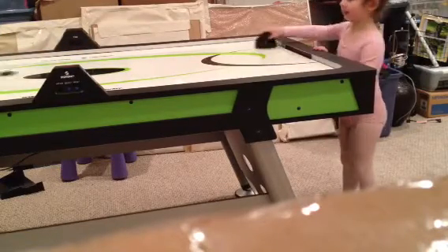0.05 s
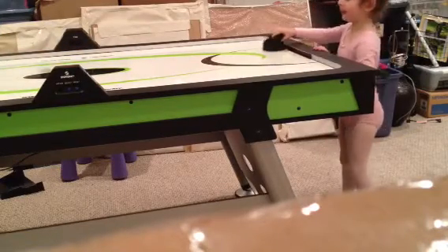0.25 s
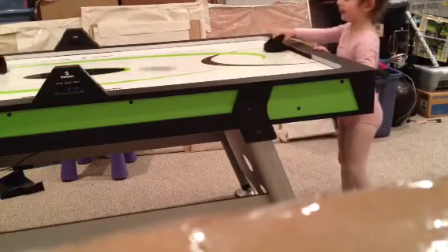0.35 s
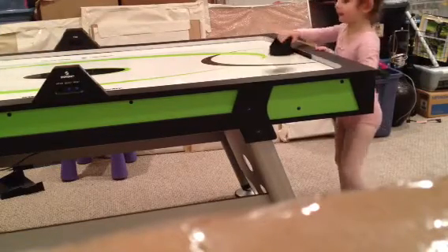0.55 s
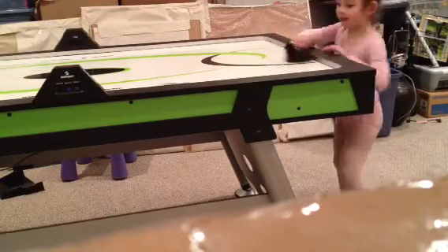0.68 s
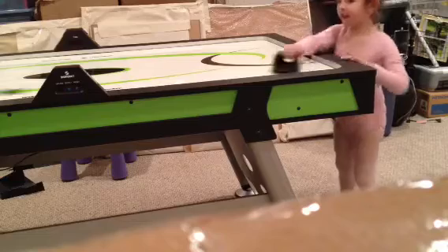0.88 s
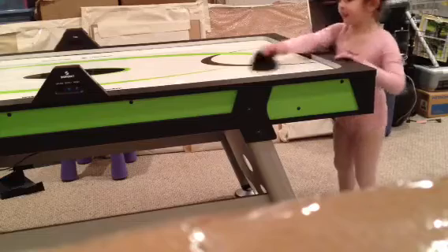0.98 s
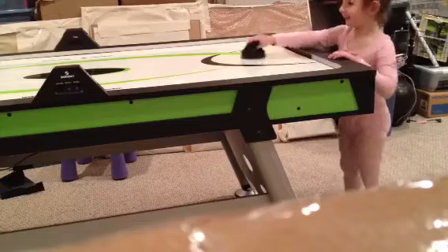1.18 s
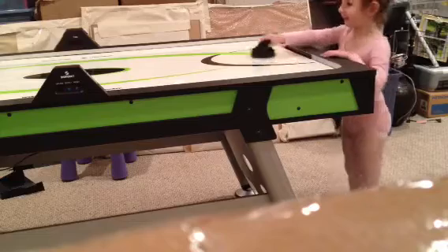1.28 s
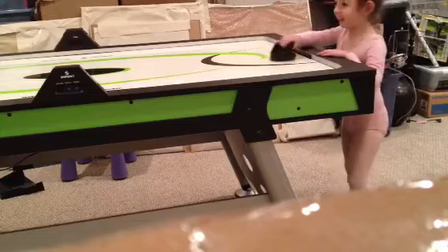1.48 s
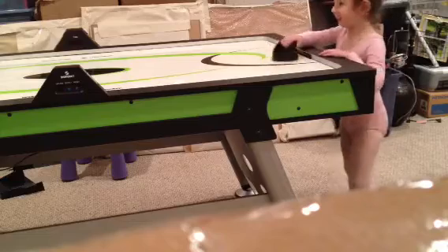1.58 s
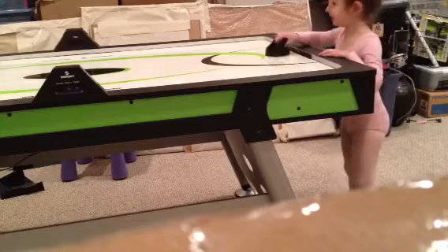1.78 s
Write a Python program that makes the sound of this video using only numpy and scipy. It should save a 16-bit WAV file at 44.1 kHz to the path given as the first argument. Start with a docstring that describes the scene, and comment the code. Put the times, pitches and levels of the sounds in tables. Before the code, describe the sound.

Air hockey puck clacking sharply off mallet and table rails over a low blower hum

```python
"""Air hockey in a carpeted room, one mono microphone; the blower's rushing air and hum run throughout.
At 0.12 s the mallet bumps and judders over the playfield with a sinking tone; at 0.21 s it strikes the puck.
The puck clacks off the rails in close pairs near 0.55 and 0.70 s; struck again at 1.12 s, it hits rails at 1.20 and 1.50 s.
Contacts are filtered clicks plus damped sines, spread by echoes, panel noise and a decaying noise room.
Strikes also make the hollow table drone: a slow-rising burst of low noise."""
import sys
import numpy as np
from scipy import signal
from scipy.fft import rfft, irfft, next_fast_len
from scipy.io import wavfile
from scipy.ndimage import map_coordinates

SR = 44100
rng = np.random.default_rng(int(sys.argv[2]) if len(sys.argv) > 2 else 0)


def transcribe(u):
    """Save the signal u as a 16-bit wav file named by the first command-line argument.

    u: samples, shape (n,) or (channels, n), limited to [-1, 1]; the rate is SR.
    q: integer samples, one column per channel.
    """
    v = np.clip(np.atleast_2d(u).T, -1, 1)
    q = np.round(v * 32767).astype(np.int16)
    wavfile.write(sys.argv[1], SR, q)


N = 81585  # 1.85 s
T = np.arange(int(SR * .6)) / SR  # time axis of one contact, s


def amp(db):
    """Decibels to gain."""
    return 10 ** (np.asarray(db) / 20)


def unit(x):
    """Scale to energy 1."""
    return x / np.sqrt(np.sum(x ** 2) + 1e-20)


def along(points, hz):
    """Read (pitch_hz, value) points on a log-frequency axis."""
    f, v = np.transpose(points)
    return np.interp(np.log(hz + 1), np.log(f + 1), v)


def wobble(rate):
    """A smooth random curve, rate knots a second."""
    knots = rng.standard_normal(int(N * rate / SR) + 4)
    return map_coordinates(knots, [np.arange(N) * rate / SR])


def filtered(x, response):
    """x times a response of frequency."""
    m = next_fast_len(len(x) + SR // 2)
    return irfft(rfft(x, m) * response(np.fft.rfftfreq(m, 1 / SR)), m)[:len(x)]


def through(x, response):
    """x convolved with a response."""
    return signal.fftconvolve(x, response)[:len(T)]


def add(out, s, x):
    """Mix x into out at time s."""
    part = out[round(s * SR):][:len(x)]
    part += x[:len(part)]


def fade(t, t60):
    """Exponential decay by 60 dB in t60 seconds."""
    return np.exp(-np.log(1000) * t / t60)


def burst(t60, rise_s):
    """Decaying noise of energy 1."""
    return unit(rng.standard_normal(len(T)) * fade(T, t60) * (1 - np.exp(-T / rise_s)))


def ring(hz, t60):
    """One damped mode of energy 1."""
    return unit(np.sin(2 * np.pi * hz * T) * fade(T, t60))


# Mallet on puck. Columns: start_s, level_db, bass_db, treble_db, panel_shake_db, room_db, snap_db,
# spot_pitch_hz (resonance of the struck spot), spot_db, puck_mode_1_db, puck_mode_2_db, puck_mode_3_db
MALLET_STRIKES = [(0.2085, 9, 6.5, 8, -1, -3.5, -9, 1750, -4, -13.5, -14, -17),
                  (1.1225, 6, 8, 7.5, 0.5, -2.5, -3, 2180, -1.5, -11.5, -13, -22)]
# Colour of the mallet's contact. Columns: pitch_hz, relative_level_db
MALLET_COLOUR = [(50, -48), (110, -44), (230, -7.5), (450, -3), (720, -9), (1100, -0.5), (1380, -10),
                 (1600, 1.5), (3000, 6), (3800, -4), (7000, -11.5), (13000, -17), (15500, -24)]
# Ringing modes of the mallet contact. Columns: pitch_hz, level_db, t60_s
MALLET_RING = [(1600, -8, 0.14), (2300, -17, 0.099), (2690, -38, 0.13), (3010, -24, 0.046)]


def mallet_strikes():
    """The plastic mallet meets the puck: a click and damped modes, with a quick rise of the panels."""
    return puck_hits(MALLET_STRIKES, MALLET_COLOUR, MALLET_RING,
                     direct_db=-8, shake_t60=0.074, shake_rise_s=0.00064)


# Puck on a rail. Columns: as in MALLET_STRIKES
RAIL_REBOUNDS = [(0.5395, 8, 1, 7, 1, 0.41, -14, 860, -6, -20, -17, -12),
                 (0.5645, -2, -1, 10, 1, -5, -6, 620, -2, -8, -13, -22),
                 (0.6995, -3, -5, -5, 0.8, -2, -26, 2040, -3.5, -33, -10.5, -34),
                 (0.7090, 0, 1.5, -21, 0.97, -4, -28, 1250, -5.5, -32, -19, -32),
                 (1.2030, 12, -3.5, 4, 0, -3.76, -27, 1074, -11.5, -27, -20.5, -39),
                 (1.4972, 9, -1, 3.5, 1, -2.55, -18, 576, -13.5, -16.5, -18.5, -15.5)]
# Colour of the rail contact. Columns: pitch_hz, relative_level_db
RAIL_COLOUR = [(50, -40), (170, -36), (300, -13.5), (520, 4), (1000, 1.5), (1350, 3), (2400, 1),
               (4600, -5.5), (5700, -17.5), (8000, -22), (9500, -21), (12800, -19.5), (15500, -36)]
# Ringing modes of the rail. Columns: pitch_hz, level_db, t60_s
RAIL_RING = [(568, -34.5, 0.27), (740, -24, 0.31), (890, -25, 0.16), (1066, -18, 0.18), (1620, -17.5, 0.18),
             (3150, -23, 0.037)]


def rail_rebounds():
    """The puck clacks off the rails, ringing lower modes and shaking the panels more slowly."""
    return puck_hits(RAIL_REBOUNDS, RAIL_COLOUR, RAIL_RING,
                     direct_db=-12, shake_t60=0.081, shake_rise_s=0.0015)


# The puck's own thin ring. Columns: pitch_hz, t60_s
PUCK_RING = [(8150, .05), (10370, .1), (12070, .025)]
PUCK_ROOM_DB = -9


def puck_hits(hits, colour, modes, direct_db, shake_t60, shake_rise_s):
    """The puck meets something hard: a snap, a crack with that object's modes, and its own thin, drier ring."""
    out = np.zeros(N)
    for s, db, bass_db, treble_db, shake_db, room_db, snap_db, spot_hz, spot_db, *puck_db in hits:
        heard_by = direct_db, shake_db, shake_t60, shake_rise_s, room_db
        contact = crack(colour, bass_db, treble_db) + body(modes)
        clack = spread(contact, *heard_by)
        spot = spread(spot_ring(spot_hz), *heard_by)
        puck = sum(amp(level) * ring(hz, t60) for level, (hz, t60) in zip(puck_db, PUCK_RING))
        puck = puck + amp(PUCK_ROOM_DB) * through(puck, room_tail())
        add(out, s, amp(db) * (clack + amp(spot_db) * spot + amp(snap_db) * snap() + puck))
    return out


BASS_HZ, TREBLE_HZ = 510, 4600  # turnover of the shelves that tilt each hit


def crack(colour, bass_db=0, treble_db=0, size=4096):
    """The causal click of one contact: a minimum-phase spectrum, tilted by two shelves."""
    hz = np.fft.rfftfreq(size, 1 / SR)
    gain = amp(along(colour, hz))
    level_gain = gain / np.sqrt(np.mean(gain ** 2))
    bass = bass_db / (1 + (hz / BASS_HZ) ** 2)
    treble = treble_db * hz ** 2 / (hz ** 2 + TREBLE_HZ ** 2)
    # folding the cepstrum forward in time puts the energy at the start of the click
    cep = irfft(np.log(level_gain * amp(bass + treble)))
    cep[1:size // 2] *= 2
    cep[size // 2 + 1:] = 0
    return np.pad(irfft(np.exp(rfft(cep))), (0, len(T) - size))


def body(modes):
    """The ring of a struck object: a sum of damped modes."""
    return sum(amp(db) * ring(hz, t60) for hz, db, t60 in modes)


SPOT_WIDTH = 0.23  # half-width of the resonance, as a share of its pitch


def spot_ring(hz):
    """The short, broad resonance of the place that is hit: a band-passed impulse."""
    edges = [hz * (1 - SPOT_WIDTH), hz * (1 + SPOT_WIDTH)]
    band = signal.butter(2, edges, "bandpass", fs=SR, output="sos")
    return unit(signal.sosfilt(band, signal.unit_impulse(len(T))))


# Colour of the hard edge contact. Columns: pitch_hz, relative_level_db
SNAP_COLOUR = [(200, -38), (3000, -33), (7000, 2.5), (10000, -6.5), (12500, 7.5), (15500, -21)]
SNAP_T60, SNAP_ECHO_S, SNAP_ECHO_DB = 0.0039, 0.0038, 13  # the echo glances off the playfield


def snap():
    """The bright, dry tick of plastic edges and its first reflection, louder than the tick itself."""
    tick = burst(SNAP_T60, .0001)
    add(tick, SNAP_ECHO_S, amp(SNAP_ECHO_DB) * burst(SNAP_T60, .0001))
    return unit(through(crack(SNAP_COLOUR), tick))


# Nearby surfaces. Columns: delay_s (nominal, after the direct sound), level_db (relative to direct)
NEARBY_ECHOES = [(.0036, 0), (.0138, 0.5), (.0205, -9), (0.0338, -5.5)]
SCATTER_T60, SCATTER_RISE_S = 0.0054, .0001  # each sound path is slightly smeared
RADIATE_HZ = 136  # the panels radiate little below this


def spread(contact, direct_db, shake_db, shake_t60, shake_rise_s, room_db):
    """A contact heard direct, off nearby surfaces, through the table's dense panel modes and in the room."""
    path = amp(direct_db) * burst(SCATTER_T60, SCATTER_RISE_S)
    for delay, db in NEARBY_ECHOES:
        varied_delay = abs(delay * (1 + .06 * rng.standard_normal()))
        add(path, varied_delay, amp(direct_db + db) * burst(SCATTER_T60, SCATTER_RISE_S))
    panels = unit(burst(shake_t60, shake_rise_s) * lumps())
    room = unit(room_tail() * lumps())
    heard = through(contact, path + amp(shake_db) * panels + amp(room_db) * room)
    low_cut = signal.butter(3, RADIATE_HZ, "highpass", fs=SR, output="sos")
    return signal.sosfilt(low_cut, heard)


RAGGED_DB, RAGGED_PER_S, RAGGED_FADE_S = 2, 300, .04  # depth, knots a second, time constant


def lumps():
    """Early reflections arrive in clumps that soon even out: a fast random gain."""
    return amp(RAGGED_DB * wobble(RAGGED_PER_S)[:len(T)] * np.exp(-T / RAGGED_FADE_S))


# Decay of the carpeted room. Columns: pitch_hz, t60_s
ROOM_DECAY = [(100, 0.15), (400, 0.37), (1000, 0.32), (3000, 0.34), (7000, 0.39), (14000, 0.18)]
ROOM_RISE_S = 0.01


def room_tail():
    """The room's answer: noise with each frequency dying at its own speed."""
    hz, t, z = signal.stft(rng.standard_normal(len(T)), SR, nperseg=256)
    decay = fade(t, along(ROOM_DECAY, hz)[:, None])
    tail = signal.istft(z * decay, SR, nperseg=256)[1][:len(T)]
    return unit(tail * (1 - np.exp(-T / ROOM_RISE_S)))


# Hollow table under a strike. Columns: pitch_hz, relative_level_db
BOOM_COLOUR = [(60, -32), (150, -12), (235, 2), (320, -4.5), (430, -2), (600, -1), (1500, -38), (8000, -65)]
BOOM_DB, BOOM_RISE_S, BOOM_T60 = -9.5, 0.012, .26  # level relative to the strike


def table_boom():
    """Each mallet strike sets the hollow table droning for a moment: low noise that swells and dies."""
    out = np.zeros(N)
    for s, db, *_ in MALLET_STRIKES:
        boom = unit(through(crack(BOOM_COLOUR), burst(BOOM_T60, BOOM_RISE_S)))
        add(out, s, amp(db + BOOM_DB) * boom)
    return out


# Colour of the mallet's bump on the playfield. Columns: pitch_hz, relative_level_db
PLAYFIELD_COLOUR = [(60, -49), (250, -2), (400, -14), (700, -1), (950, -6), (1200, -13), (1450, -15),
                    (1900, -19), (5000, -32.5), (15000, -40)]
SCUFF_S, SCUFF_DB, SCUFF_KNOCK_DB = .1245, -33, -9.5  # start, tone level, knock level
SCUFF_START_HZ, SCUFF_END_HZ, SCUFF_SINK_S = 679, 477, 0.0136  # sink is a time constant
SCUFF_HOLD_S, SCUFF_T60 = .04, .17
JUDDER_DB, JUDDER_TURN = 2.5, .55  # random level, random phase in radians


def scuff():
    """The mallet bumps the playfield and judders over it briefly with a hollow, sinking ring."""
    hz = SCUFF_END_HZ + (SCUFF_START_HZ - SCUFF_END_HZ) * np.exp(-T / SCUFF_SINK_S)
    level = (1 - np.exp(-T / 0.0041)) * fade(np.maximum(T - SCUFF_HOLD_S, 0), SCUFF_T60)
    judder_gain = amp(JUDDER_DB * wobble(150))[:len(T)]
    judder_phase = JUDDER_TURN * wobble(160)[:len(T)]
    tone = level * judder_gain * np.sin(2 * np.pi * np.cumsum(hz) / SR + judder_phase)
    knock = spread(crack(PLAYFIELD_COLOUR), direct_db=-5, shake_db=-2, shake_t60=.08,
                   shake_rise_s=.002, room_db=-2)
    out = np.zeros(N)
    add(out, SCUFF_S, amp(SCUFF_DB) * tone + amp(SCUFF_KNOCK_DB) * knock)
    return out


# Colour of the blower's air. Columns: pitch_hz, relative_level_db (per Hz)
BLOWER_AIR = [(18, -82), (30, -96), (97, -16.5), (260, 0), (346, -4.5), (415, -1), (567, -4.5), (815, -3),
              (881, -9.5), (1170, -3), (1650, -8), (2840, -13.5), (5300, -22.5), (7830, -24),
              (15000, -28.5)]
# Blower motor and fan tones. Columns: pitch_hz, level_db (RMS, before sway)
BLOWER_HUM = [(120, -71), (242, -66.5), (404, -63), (969, -63.5), (1200, -79)]
AIR_DB, AIR_SWAY_DB, HUM_SWAY_DB = -48.5, .5, 1.5


def blower():
    """Rushing air, as coloured noise, with slightly unsteady motor and fan tones."""
    noise = rng.standard_normal(N)
    air = unit(filtered(noise, lambda hz: amp(along(BLOWER_AIR, hz)))) * np.sqrt(N)  # RMS 1
    t = np.arange(N) / SR
    hum = np.zeros(N)
    for hz, db in BLOWER_HUM:
        level = amp(db + HUM_SWAY_DB * wobble(5.9))
        hum += level * np.sin(2 * np.pi * hz * t + 1.7 * wobble(2.9))
    return amp(AIR_DB + AIR_SWAY_DB * wobble(6.73)) * air + np.sqrt(2) * hum


def scene():
    """Strikes, rebounds, table boom, a scuff and the blower, in mono."""
    contacts = mallet_strikes() + rail_rebounds()
    return (contacts + table_boom() + scuff() + blower())[None]


TOP_HZ = 15600  # the microphone's band limit


def record(dry):
    """The microphone rounds off the highest peaks and keeps nothing above its band limit."""
    rounded = dry[0] / (1 + np.abs(dry[0] / .8) ** 4) ** (1 / 4)
    return filtered(rounded, lambda hz: hz < TOP_HZ)[None]


dry = scene()
out = record(dry)
transcribe(out)
```